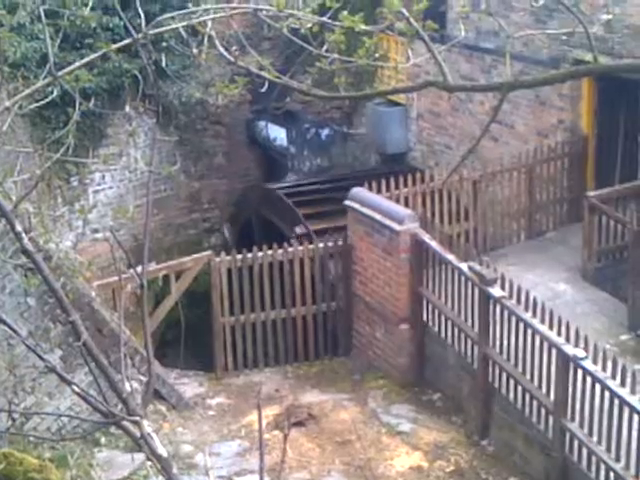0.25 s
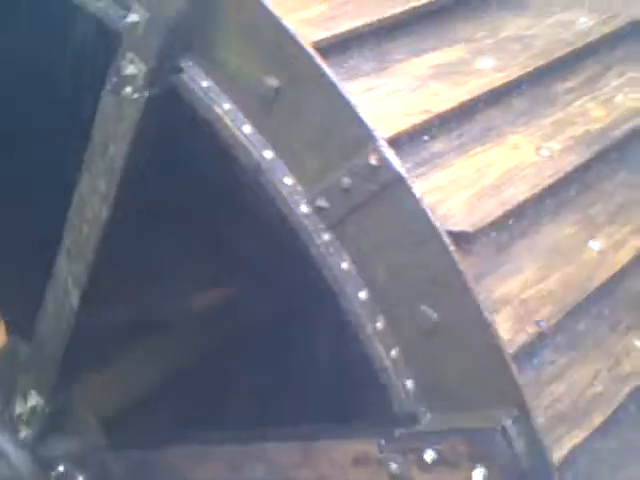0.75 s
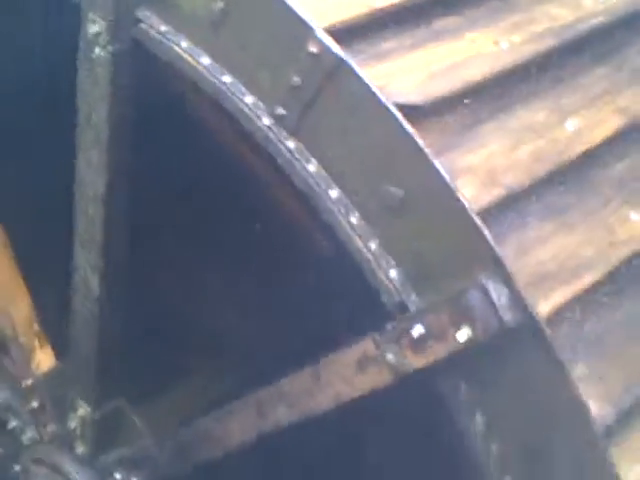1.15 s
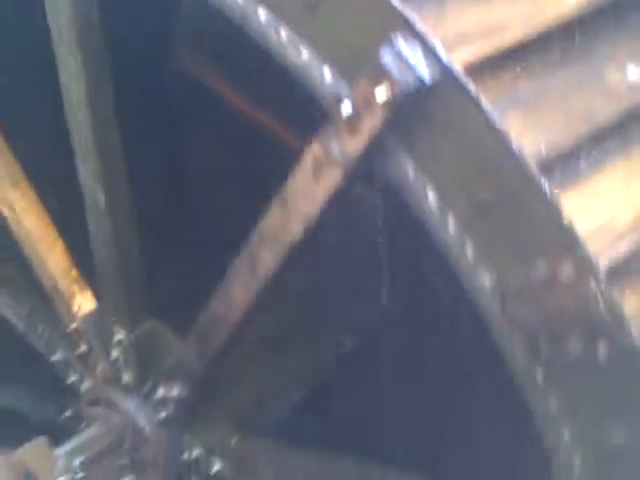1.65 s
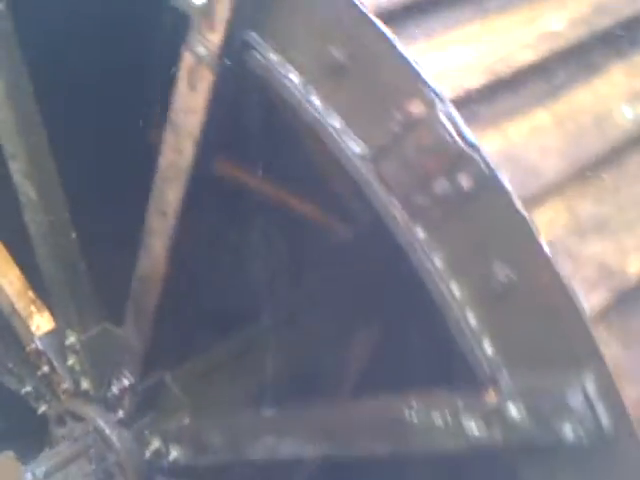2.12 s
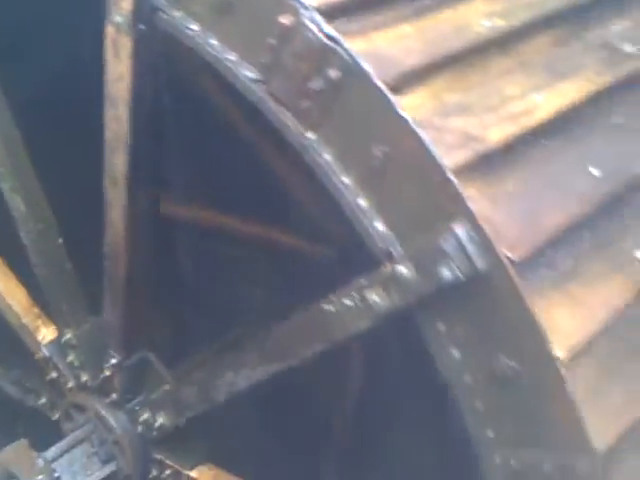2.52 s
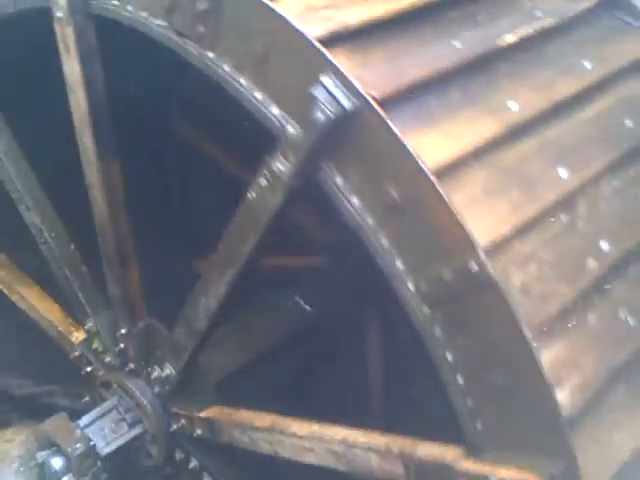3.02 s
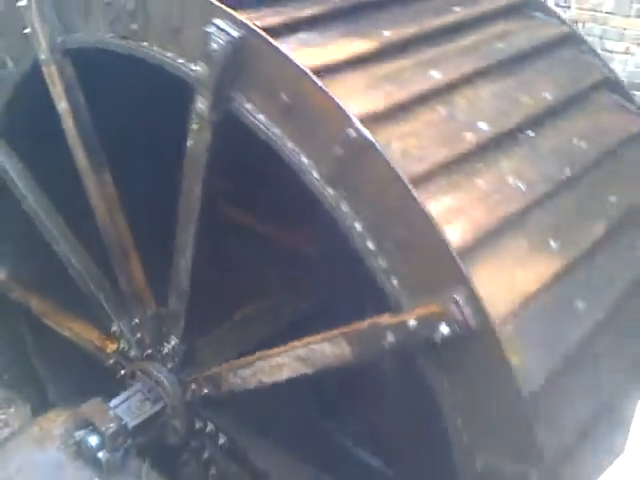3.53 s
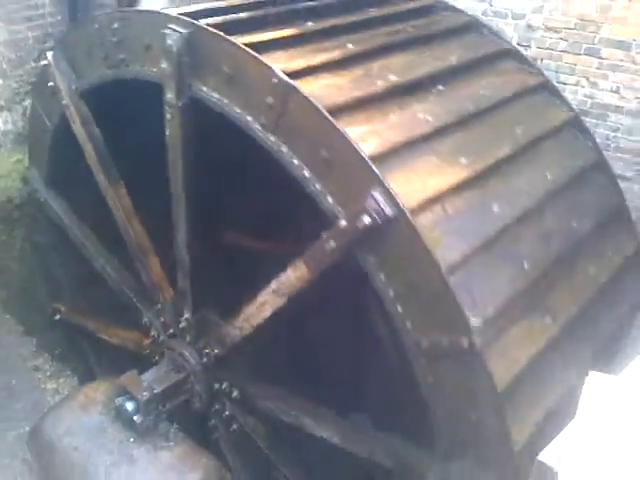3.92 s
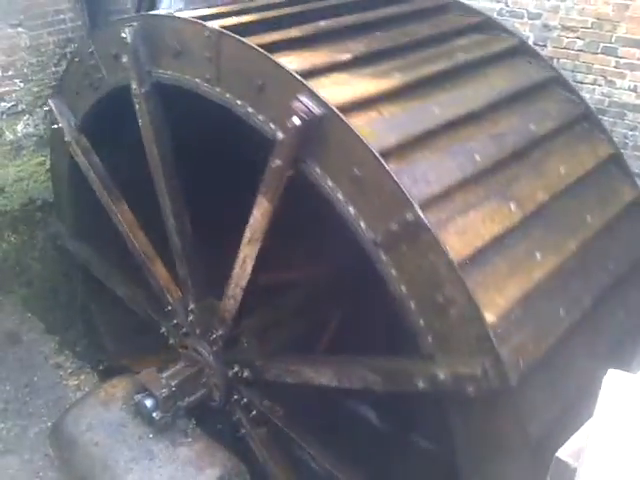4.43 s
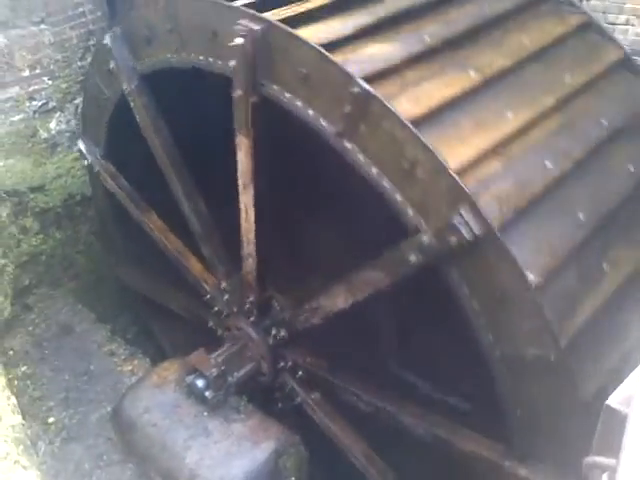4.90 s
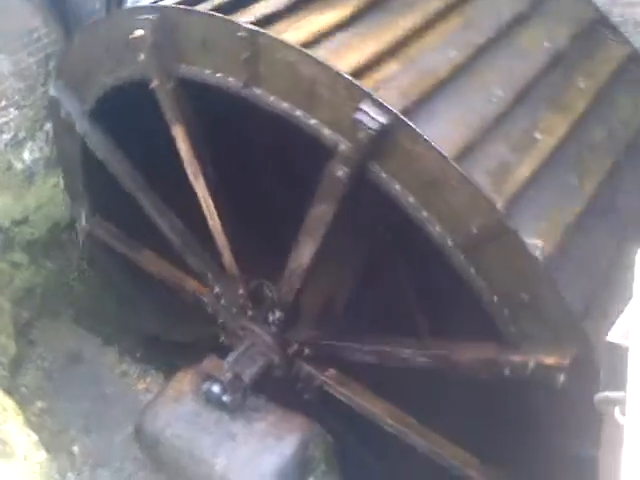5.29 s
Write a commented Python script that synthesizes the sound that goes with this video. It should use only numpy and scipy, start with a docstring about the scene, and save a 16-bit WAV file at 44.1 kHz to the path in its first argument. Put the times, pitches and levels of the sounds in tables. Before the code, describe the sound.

Water pours over a large iron waterwheel in a brick pit, first heard from across a yard as a dull, gently surging wash. After a small tick and a click, the microphone is suddenly beside the rim. A sheet of water rushes steadily, bubbles churn in the pool, emptying buckets gurgle and fine spray patters, with occasional low plunks and crisp spatters on the iron.

```python
"""Water over an iron waterwheel

Water pours over a big wheel in a brick pit. From across the yard it is a wash that surges as buckets
spill. After a small tick and a click we are beside the rim: the falling sheet rushes, big bubbles
churn in the pool, emptying buckets gurgle and spray patters. Now and then a slug of water plunges
into the pit or spatters on the iron, and a thin sizzle comes and goes."""
import sys
import numpy as np
from scipy import signal
from scipy.fft import rfft, irfft, next_fast_len
from scipy.io import wavfile
from scipy.ndimage import uniform_filter1d

SR = 44100
rng = np.random.default_rng(int(sys.argv[2]) if len(sys.argv) > 2 else 0)


def unload_audio(sound):
    """Save the sound as a 16-bit wav file, at the path given as the first command line argument."""
    columns = np.transpose(np.atleast_2d(sound))
    # keep every value between -1 and 1, then stretch to whole-number steps
    steps = np.round(np.clip(columns, -1, 1) * 32767)
    wavfile.write(sys.argv[1], SR, steps.astype(np.int16))


N = 245195
TIME = np.arange(N) / SR
CLOSE_AT_S = 0.8155  # when we jump from across the yard to beside the rim

# tone of the water beside the wheel: f/Hz, relative level/dB
NEAR_TONE = [(30, -31.5), (125, -36), (200, -11), (300, 0.5), (440, -0.5), (590, -6.5), (850, -2.5),
             (1180, -2.5), (1550, -4.5), (2350, -6), (2720, -10.5), (2980, -9), (3150, -6.5), (3450, -8),
             (3680, -10), (4400, -11.5), (6700, -32.5), (7800, -64.5)]
# duller tone of the water from across the yard: f/Hz, relative level/dB
FAR_TONE = [(40, -41.5), (145, -34), (280, -2.5), (420, -6.5), (490, -12), (700, -2), (1180, -0.5),
            (1370, -3.5), (1640, -3.5), (1950, -9.5), (2110, -20.5), (2420, -15.5), (2790, -24.5),
            (3180, -15), (3680, -19), (4400, -23.5), (5800, -40.5), (8000, -55.5)]
# the falling sheet thickens or thins for a moment: t/s, level change/dB, half length/s
SHEET_CHANGES = [(1.16, -1.5, 0.032), (2.68, 1.7, 0.039), (4.79, -2.2, 0.036), (5.33, 1, .12)]
# strength of the spray along the rim: t/s, level/dB
SPRAY_CURVE = [(.82, -40.5), (.94, -38.3), (1.2, -39), (1.9, -39.5), (2.3, -38.5), (2.75, -37), (3.22, -38),
               (3.65, -36.9), (4.2, -37), (4.5, -37), (5.29, -37), (5.39, -39), (5.55, -39.5)]
# fuller buckets emptying: t/s, level/dB, half length/s, middle f/Hz
BUCKET_GUSHES = [(0.838, -39, 0.023, 800), (1.457, -39, 0.032, 750), (1.978, -42, 0.066, 1050),
                 (2.41, -37.5, 0.027, 884), (2.69, -44, 0.054, 1000), (4.14, -38.5, 0.14, 720),
                 (4.45, -38, .04, 1300), (4.935, -37, 0.042, 950), (5.403, -39, .05, 1200)]
# slugs of water trapping air in the pool: t/s, level/dB, f/Hz, fade time/cycles
AIR_POCKETS = [(.817, -32, 315, 5), (0.818, -24, 1060, 2), (1.010, -24, 288, 3.1), (2.415, -29, 420, 5.9),
               (2.617, -29.5, 530, 6), (2.635, -30.5, 385, 6.7), (2.69, -30, 373, 6),
               (4.308, -32, 306, 3.5), (4.322, -22.5, 347, 6.4), (4.358, -24.5, 340, 7.4),
               (4.97, -31, 293, 3.2), (5.238, -30, 305, 5.5), (5.271, -29.5, 293, 5.9),
               (5.303, -23, 369, 4.6), (5.332, -29.5, 275, 6.6), (5.525, -27, 372, 4.8)]
# water slapping the iron: t/s, level/dB, fade time/s, brightest f/Hz
IRON_SLAPS = [(2.634, -30, 0.011, 3500), (3.993, -35, .018, 3500), (4.613, -27, 0.0061, 3600),
              (4.617, -29, 0.0098, 2400), (4.64, -34, .01, 3400), (4.982, -37, .012, 3360)]
# buckets spilling, heard from across the yard: t/s, rise in splash level/dB, half length/s
BUCKET_SPILLS = [(.135, 3, 0.051), (.45, 2.5, 0.06), (.71, 2.5, 0.08)]
# thin sizzles above the spray: t/s, level/dB, half length/s
HIGH_SIZZLES = [(1.303, -55.5, 0.067), (1.52, -57, 0.08), (5.478, -57, .05)]
# the tones that ring in the small tick: f/Hz, level/dB, rise time/s
TICK_TONES = [(2670, -30, 0.00048), (3760, -25.5, 0.00072), (4500, -27, 0.00061)]
# the body and the thin top of the click: level/dB, f/Hz, half length/s
CLICK_TONES = [(-23, 1900, 0.00026), (-44, 6800, 0.00027)]


def falling_sheet(distance, swell):
    """The falling sheet of water rushes and breaks into small bubbles."""
    swarm = bubbles(per_s=2000, spread_db=1.5, low_hz=462, high_hz=3178, cycles=3.76, rise=0.04, sizes=70)
    rush = turbulence(patch_db=0.2, flicker_db=0.5, patch_frames=12)
    level_db = -34 - 0.9 * distance + 0.08 * swell + humps_db(SHEET_CHANGES)
    return gain_of(level_db) * water(rush, swarm, swarm_db=-3.5, low_hz=565, high_hz=2560)


def pool(distance, swell):
    """Large bubbles churn densely in the water under the wheel."""
    swarm = bubbles(per_s=600, spread_db=-1, low_hz=216.3, high_hz=644, cycles=2.5, rise=0.035, sizes=24)
    rush = turbulence(patch_db=1.5, flicker_db=-0.36, patch_frames=8)
    level_db = -38.5 - 2 * distance + 0.5 * swell
    return gain_of(level_db) * water(rush, swarm, swarm_db=-2, low_hz=38, high_hz=534)


def spray():
    """Fine drops patter on the buckets over a soft fizz."""
    swarm = bubbles(per_s=3500, spread_db=3, low_hz=2050, high_hz=7520, cycles=4.6, rise=0.034, sizes=40)
    rush = turbulence(patch_db=0.7, flicker_db=-0.32, patch_frames=8)
    level_db = np.interp(TIME, *np.transpose(SPRAY_CURVE))
    return gain_of(level_db) * water(rush, swarm, swarm_db=-4.5, low_hz=2450, high_hz=9000)


def gushes():
    """A fuller bucket empties: a short, hollow gurgle of middle-sized bubbles."""
    swarm = bubbles(per_s=3500, spread_db=2, low_hz=495, high_hz=1788, cycles=6, rise=0.037, sizes=28)
    out = np.zeros(N)
    for s, db, half_s, hz in BUCKET_GUSHES:
        gurgle = shape_tone(swarm, NEAR_TONE, low_hz=hz / 1.43, high_hz=hz * 1.43)
        out += gain_of(db) * hump(s, half_s) * gurgle
    return out


def plunges():
    """Each slug of water traps a large pocket of air, which booms briefly in the pit."""
    out = np.zeros(N)
    for s, db, hz, cycles in AIR_POCKETS:
        add(out, s, gain_of(db) * bubble(hz, cycles, rise=0.016))
    rumble_cut = signal.butter(4, 210, "highpass", fs=SR, output="sos")
    return pit_echo(signal.sosfilt(rumble_cut, out), echo_db=-10, echo_s=0.15)


def spatters():
    """Drops slap the iron: crisp bursts of noise, each brightest around one pitch."""
    out, t = np.zeros(N), np.arange(SR // 6) / SR
    width_hz, rise_s = 2800, 0.00091
    for s, db, fade_s, hz in IRON_SLAPS:
        bright_band = signal.iirpeak(hz, hz / width_hz, fs=SR)
        noise = signal.lfilter(*bright_band, rng.standard_normal(len(t)))
        slap = shape_tone(noise, NEAR_TONE, low_hz=2100, high_hz=7000)
        loudness = np.exp(-t / fade_s) * (1 - np.exp(-t / rise_s))
        add(out, s, gain_of(db) * loudness * slap)
    return pit_echo(out, echo_db=-10, echo_s=0.25)


def distant_wheel():
    """Across the yard the drops blur into a wash that surges as the buckets spill."""
    low_rush = turbulence(patch_db=2, flicker_db=0, patch_frames=14)
    high_rush = turbulence(patch_db=0.5, flicker_db=0.6, patch_frames=10)
    body = shape_tone(low_rush, FAR_TONE, low_hz=23, high_hz=1270)
    splash = shape_tone(high_rush, FAR_TONE, low_hz=1565, high_hz=9000)
    steady_db, spill_db = -42.5, humps_db(BUCKET_SPILLS)
    wash = gain_of(steady_db + 0.19 * spill_db) * body + gain_of(steady_db + spill_db) * splash
    dip_db = -1.5 * hump(at_s=0.8, half_s=0.04)  # the level dips briefly
    return gain_of(dip_db) * wash


def sizzles():
    """A narrow, high hiss comes and goes above the spray."""
    middle_hz, spread_hz = 5910, 460
    hz = np.fft.rfftfreq(N, 1 / SR)
    band = np.exp(-((hz - middle_hz) / spread_hz) ** 2 / 2)
    hiss = unit_level(irfft(rfft(rng.standard_normal(N)) * band, N))
    return hiss * sum(gain_of(db) * hump(s, half_s) for s, db, half_s in HIGH_SIZZLES)


def tick(at_s):
    """One small, dry tick: three high tones that start softly and die at once."""
    out, t = np.zeros(N), np.arange(SR // 100) / SR
    for hz, db, rise_s in TICK_TONES:
        loudness = (t / rise_s * np.exp(1 - t / rise_s)) ** 2
        add(out, at_s, gain_of(db) * loudness * np.sin(2 * np.pi * hz * t))
    return out


def click(at_s):
    """A thin, dry click: two tones, each about a millisecond long."""
    return sum(gain_of(db) * hump(at_s, half_s) * np.sin(2 * np.pi * hz * (TIME - at_s))
               for db, hz, half_s in CLICK_TONES)


def water(rush, swarm, swarm_db, low_hz, high_hz):
    """Running water is rushing noise plus ringing bubbles in the same range of pitch."""
    rush = shape_tone(rush, NEAR_TONE, low_hz, high_hz)
    swarm = shape_tone(swarm, NEAR_TONE, low_hz, high_hz)
    return unit_level(rush + gain_of(swarm_db) * swarm)


def bubble(hz, cycles, rise):
    """A pocket of air rings and fades, its pitch rising as it nears the surface."""
    fade_s = cycles / hz
    age = np.arange(int(5 * fade_s * SR)) / SR / fade_s  # counted in fade times
    ring = np.sin(2 * np.pi * cycles * (age + rise * age ** 2 / 2))
    return ring * np.exp(-age) * (1 - np.exp(-10 * age))


def bubbles(per_s, spread_db, low_hz, high_hz, cycles, rise, sizes):
    """A swarm of bubbles born at random times and strengths; each size has its own pitch."""
    out = np.zeros(N)
    for hz in np.linspace(low_hz, high_hz, sizes):
        born = rng.random(N) < per_s / sizes / SR
        strength = gain_of(spread_db * np.clip(rng.exponential(1, N), 0, 4))
        ring = bubble(hz, cycles, rise)
        out += signal.oaconvolve(born * strength, ring / np.linalg.norm(ring))[:N]
    return unit_level(out)


def turbulence(patch_db, flicker_db, patch_frames):
    """Noise that swells in short patches of pitch and flickers as a whole where water lands."""
    frames = N // 128 + 5  # time steps of about 3 ms
    real, imaginary, patches = rng.standard_normal((3, frames, 257))
    patches = uniform_filter1d(patches, size=patch_frames, axis=0)  # smooth over time
    patches = unit_level(uniform_filter1d(patches, size=7, axis=1))  # smooth over pitch
    flicker = unit_level(uniform_filter1d(rng.standard_normal(frames), size=7))[:, None]
    spectrum = (real + 1j * imaginary) * gain_of(patch_db * patches + flicker_db * flicker)
    _, noise = signal.istft(spectrum.T, nperseg=512, noverlap=384)
    return unit_level(noise[:N])


def pit_echo(x, echo_db, echo_s):
    """The brick walls throw back a short, dense echo that fades by 60 dB in echo_s."""
    t = np.arange(SR // 2) / SR
    signs = rng.choice([-1., 1.], len(t))
    bounces = (rng.random(len(t)) < 2000 / SR) & (t > 0.005)  # about 2000 a second, after 5 ms
    tail = signs * bounces * 1000 ** (-t / echo_s)
    return x + gain_of(echo_db) * signal.oaconvolve(x, tail / np.linalg.norm(tail))[:N]


def shape_tone(x, tone, low_hz, high_hz):
    """Gives x the tone from a table and softly cuts what lies below low_hz and above high_hz."""
    size = next_fast_len(len(x), True)
    hz = np.fft.rfftfreq(size, 1 / SR) + 1
    table_hz, table_db = np.transpose(tone)
    curve = gain_of(np.interp(np.log(hz), np.log(table_hz), table_db))
    edges = 1 / np.sqrt((1 + (low_hz / hz) ** 16) * (1 + (hz / high_hz) ** 16))
    return unit_level(irfft(rfft(x, size) * edges * curve, size)[:len(x)])


def hump(at_s, half_s):
    """A smooth rise to 1 and back, centred on at_s."""
    return np.exp(-((TIME - at_s) / half_s) ** 2)


def humps_db(rows):
    """A level curve in dB made of brief rises and dips."""
    return sum(db * hump(s, half_s) for s, db, half_s in rows)


def gain_of(db):
    """Turns decibels into a number to multiply a sound by."""
    return 10 ** (np.asarray(db) / 20)


def unit_level(x):
    """Scales x so that its average strength (rms) is one."""
    return x / np.sqrt(np.mean(x ** 2) + 1e-20)


def add(mix, at_s, sound):
    """Mixes a sound in, starting at at_s."""
    part = mix[round(at_s * SR):][:len(sound)]
    part += sound[:len(part)]


def scene():
    """The distant wash gives way at once to the water close by."""
    close_for_s = TIME - CLOSE_AT_S
    distance = np.exp(-np.maximum(close_for_s, 0) / 1.2)  # share of our last steps still to go
    swell = np.cos(2 * np.pi * (TIME - 2.63) / 1.53)  # the flow swells gently every 1.53 s
    near = pool(distance, swell) + falling_sheet(distance, swell)
    near += gushes() + spray() + sizzles() + plunges() + spatters()
    far = distant_wheel() + tick(at_s=0.7827)
    near_share = np.clip(close_for_s / 0.0015, 0, 1)
    mix = (1 - near_share) * far + near_share * near + click(at_s=CLOSE_AT_S)
    return mix[None]


def record(dry):
    """Takes away the highest treble, above 8300 Hz."""
    treble_cut = signal.firwin(511, 8300, window=("kaiser", 9), fs=SR)
    return signal.oaconvolve(dry, treble_cut[None], "same")


dry = scene()
out = record(dry)
unload_audio(out)
```